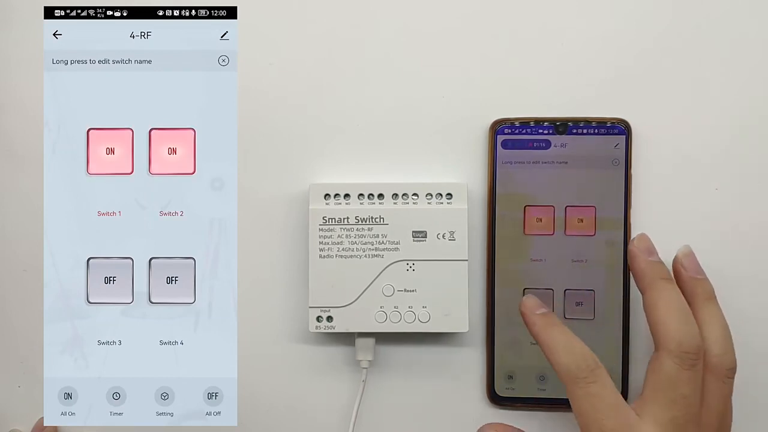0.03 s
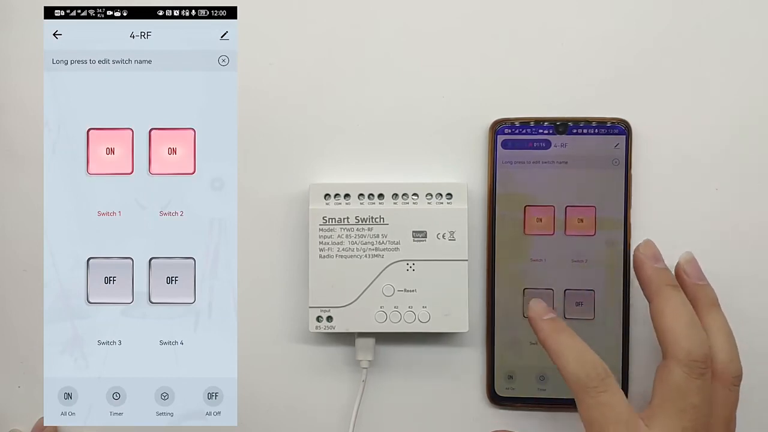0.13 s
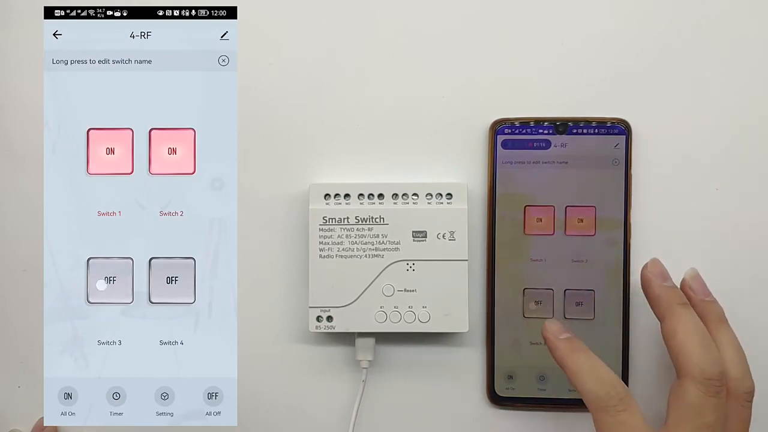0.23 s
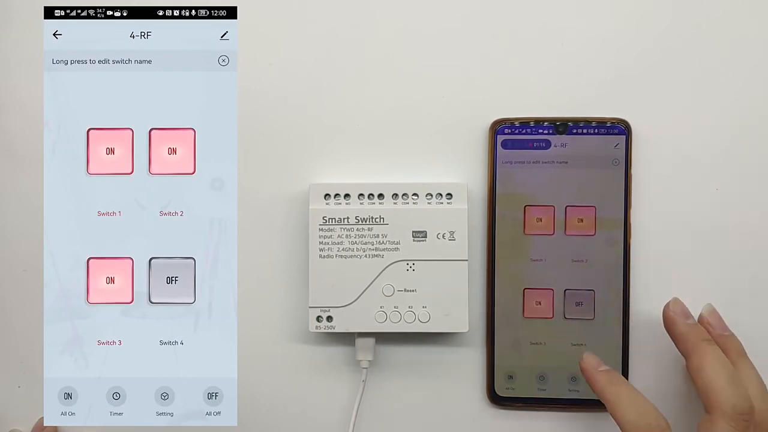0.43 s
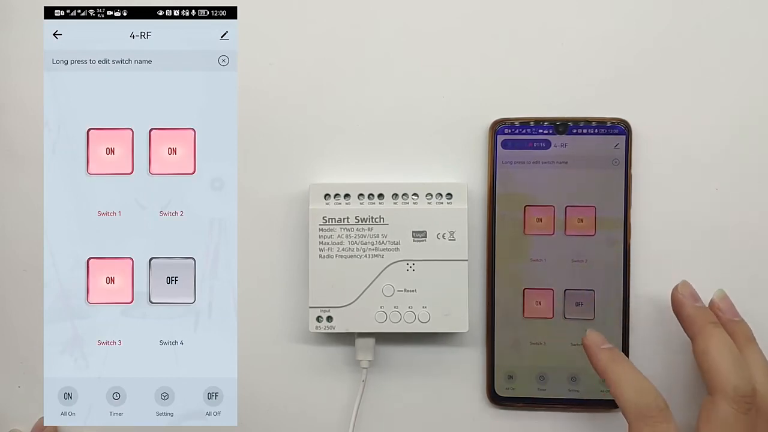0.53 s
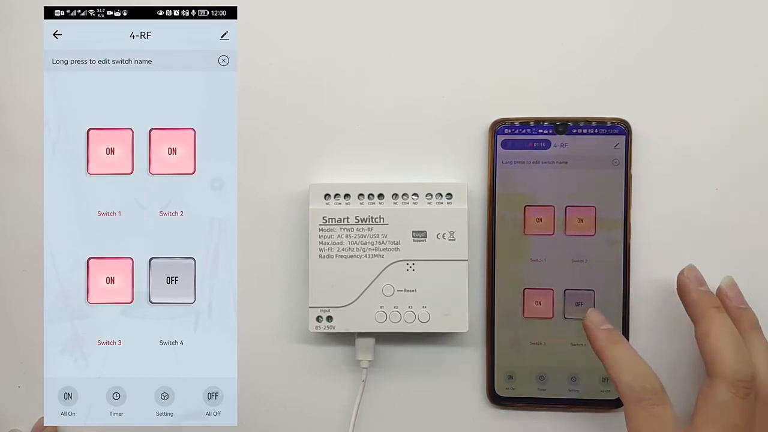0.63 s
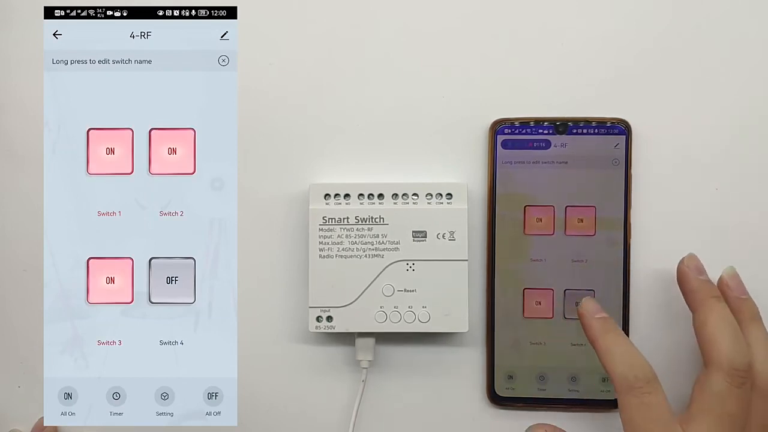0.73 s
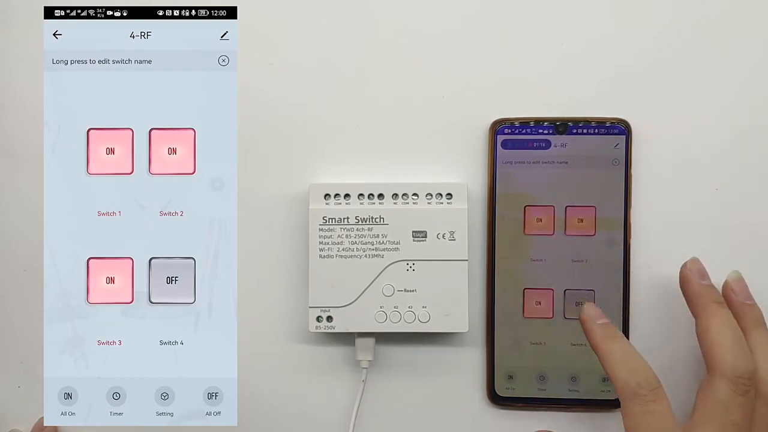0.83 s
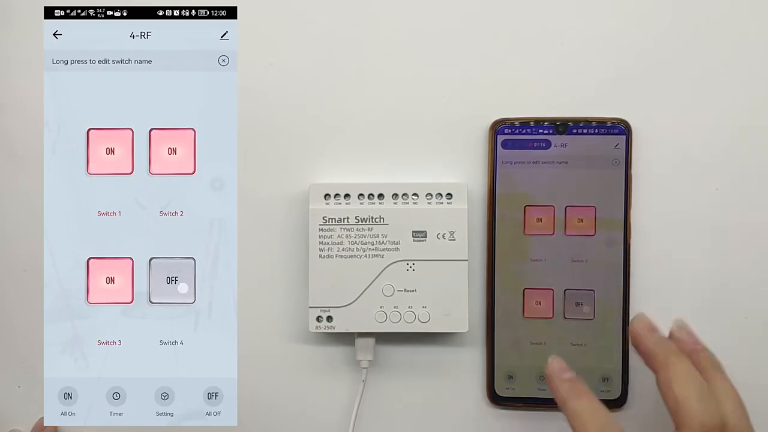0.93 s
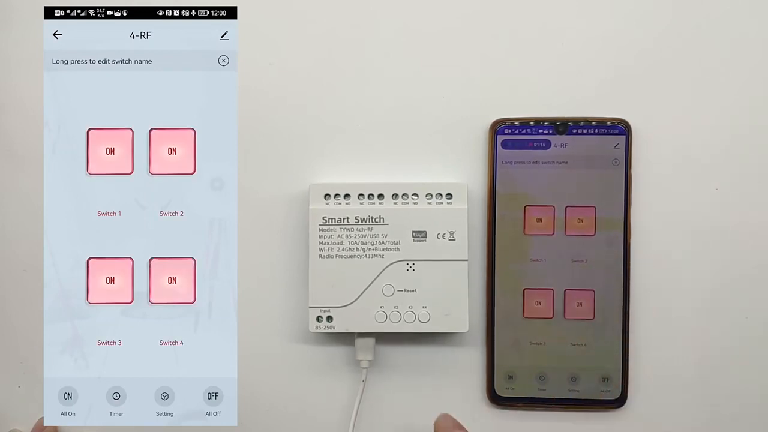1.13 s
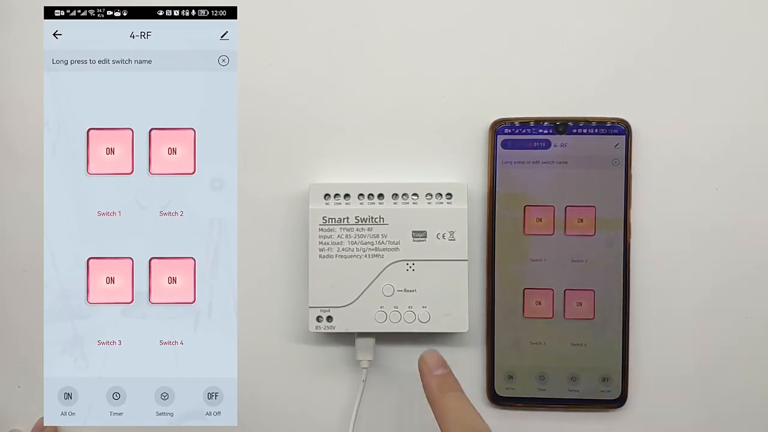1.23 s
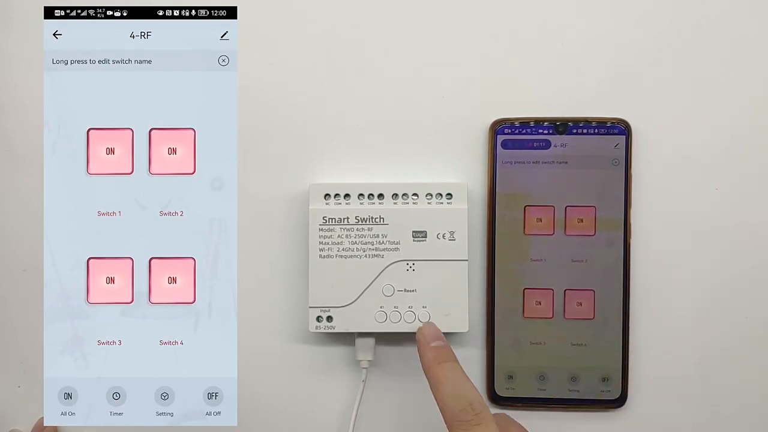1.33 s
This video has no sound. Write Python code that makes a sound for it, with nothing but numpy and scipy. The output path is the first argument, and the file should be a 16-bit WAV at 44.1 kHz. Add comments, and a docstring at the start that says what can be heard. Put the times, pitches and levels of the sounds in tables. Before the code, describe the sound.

Two short, sharp relay clicks from a small switch module over faint room noise.

```python
"""Two relays closing

Two relays in a small plastic switch module on a table close one after the other in a quiet room.
Each click swells in over a few milliseconds, then the armature strikes and chatters, exciting damped
resonances of relay and case, mostly on the right; table and room reflect them. Behind them are a few
tiny ticks, a low rumble with a weak hum, a softly swelling hiss and a faint tone."""
import sys
import numpy as np
from scipy import signal
from scipy.fft import rfft, irfft, next_fast_len
from scipy.io import wavfile
from scipy.ndimage import map_coordinates

SR = 44100
rng = np.random.default_rng(int(sys.argv[2]) if len(sys.argv) > 2 else 0)


def wav_record(signal):
    """Record a signal, one row per channel, as 16-bit PCM in the file named by sys.argv[1]."""
    frames = np.transpose(np.atleast_2d(signal))
    bounded = np.clip(frames, -1, 1)
    # unit amplitude maps onto the largest positive 16-bit level
    quanta = np.round(bounded * 32767).astype(np.int16)
    wavfile.write(sys.argv[1], SR, quanta)


N = 61739
TIME = np.arange(N) / SR
TONE_WAVER_DB, TONE_LEFT_DB = 3.5, -7  # shared by the hum and the faint tone


def relay(closing, resonances):
    """Impact excitation: the click swells in, then the armature strikes and chatters; the case rings."""
    # armature strikes in one closing: delay_s (before stretching), relative_level_db
    contacts = [(0, -4.5), (.0014, -2.5), (.0027, -3.5), (.0043, -5.5)]
    start_s, level_db, onset_rise_s, chatter_t60_s, stretch = closing
    t = TIME - start_s
    soft_onset = amp(-8.5) * fade(-t, t60_s=2 * onset_rise_s)  # grows up to the first strike
    strikes = sum(amp(db) * fade(t - delay_s * stretch, t60_s=0.0041) for delay_s, db in contacts)
    chatter = amp(-5.5) * fade(t, chatter_t60_s) * build_up(t, rise_s=0.0011)
    blow = (soft_onset + strikes + chatter) * rng.choice([-1, 1], (2, N))
    direct = case(blow / np.linalg.norm(blow), resonances, spread=1)
    reflected = case(reflections(start_s), resonances, spread=1.21)
    return amp(level_db) * burst(direct + reflected)


def case(x, resonances, spread):
    """Modal resonance: the modes of relay and case, widened by spread, add in power and filter x."""
    def power(f):
        return sum(amp([[left_db], [right_db]]) ** 2 * peak(f, hz, width_hz * spread)
                   for hz, width_hz, left_db, right_db in resonances)
    return filtered(x, lambda f: minimum_phase(np.sqrt(power(f) / spread)))


def reflections(start_s):
    """Reverberation: early reflections from the table and things near by, then the room's weak tail."""
    # decay of the early reflections: frequency_hz, t60_s
    table_decay = [(1000, 0.11), (3300, 0.065), (7000, 0.076), (14000, 0.07)]
    # decay of the room: frequency_hz, t60_s
    room_decay = [(1000, 0.89), (3300, .5), (7000, 0.35), (14000, 0.23)]
    early = amp(-1.5) * tail(start_s, table_decay, rise_s=0.0017)
    late = amp(-30.5) * tail(start_s, room_decay, rise_s=0.019)
    return early + late


def tail(start_s, decay, rise_s):
    """Diffuse field: stereo noise of energy 1 builds up, then each band decays at its own rate."""
    hz, t, bands = signal.stft(rng.standard_normal((2, N)), SR, nperseg=128)
    bands = bands * fade(np.maximum(t - start_s, 0), along(decay, hz)[:, None])
    field = signal.istft(bands, SR, nperseg=128)[1][:, :N]
    field = field * build_up(TIME - start_s, rise_s)
    return field / np.linalg.norm(field)


def ticks():
    """Transient excitation: each tiny tick is decaying noise through one broad resonance."""
    # ticks: start_s, level_db (before panning), centre_hz, width_hz, t60_s
    taps = [(0.2564, -56, 2860, 1180, 0.26), (0.808, -65.5, 5300, 2980, 0.01),
            (.8364, -67.5, 3260, 2000, 0.026), (.9434, -79, 3500, 2500, 0.022)]
    out = np.zeros((2, N))
    for start_s, level_db, centre_hz, width_hz, t60_s in taps:
        tap = fade(TIME - start_s, t60_s) * rng.standard_normal((2, N))
        tick = filtered(tap, lambda f: minimum_phase(np.sqrt(peak(f, centre_hz, width_hz))))
        out += amp(level_db) * burst(tick)
    return out * pan(left_db=-7.5)


def background():
    """Amplitude modulation: three noise bands swell gently, and the hum follows the rumble."""
    # band envelopes: time_s, hiss_db, middle_db, rumble_db
    envelopes = [(0, -72, -66.5, -59), (.09, -75, -68, -60), (.18, -73, -70, -63.5),
                 (.27, -65.5, -66.5, -62), (.35, -67.5, -66.5, -63.5), (.44, -73.5, -66, -61),
                 (.57, -62.5, -64, -59.5), (.63, -66.5, -65, -60.5), (.72, -73, -66.5, -62.5),
                 (.87, -73, -68.5, -61), (.96, -71, -66, -61.5), (1.009, -67, -65.5, -59.5),
                 (1.08, -73.5, -68, -63), (1.17, -74, -72.5, -65), (1.25, -72.5, -69.5, -64.5),
                 (1.39, -75, -68.5, -60)]
    # spectral shapes of the three bands: frequency_hz, relative_density_db
    hiss_shape = [(300, -28), (1200, -6.5), (2800, -1.5), (5000, -5), (8000, -12.5), (12000, -5),
                  (15500, -8.5)]
    middle_shape = [(100, -38), (350, -3), (500, -4.5), (660, -2), (850, -4), (1150, -3), (1700, -10.5),
                    (4000, -23), (12000, -43.5)]
    rumble_shape = [(15, 0.5), (27, 4), (45, -2.5), (65, -7.5), (110, -4.5), (150, -7.5), (220, -0.5),
                    (280, -6.5), (380, -16.5), (900, -31.5), (4000, -78)]
    time_s, *levels_db = np.transpose(envelopes)
    hiss, middle, rumble = [amp(np.interp(TIME, time_s, db)) for db in levels_db]
    drone = hum()
    return hiss * air(hiss_shape) + middle * air(middle_shape) + rumble * (air(rumble_shape) + drone)


def air(spectrum):
    """Partial coherence: stereo noise of rms 1, nearly mono in the bass and mostly on the right."""
    # likeness of left and right: frequency_hz, correlation
    coherence = [(60, 0.89), (200, 1), (500, 0.27), (1500, 0.2), (5000, 0.13), (14000, 0.13)]
    # channel balance: frequency_hz, left_minus_right_db
    balance = [(60, -6), (200, -9.5), (380, -2), (700, -7.5), (2400, -5.5), (4400, -3.5), (8000, 0.5),
               (11000, -14.5), (15000, -11.5)]

    def mid_side_gains(f):
        angle = np.arccos(np.clip(along(coherence, f), -1, 1)) / 2
        return amp(along(spectrum, f)) * [np.cos(angle), np.sin(angle)]
    mid, side = filtered(rng.standard_normal((2, N)), mid_side_gains)
    stereo = np.array([mid + side, mid - side])
    return unit(filtered(stereo, lambda f: amp([along(balance, f), 0 * f])))


def hum():
    """Superposition: three low, independently wavering tones make a weak hum."""
    # hum partials: pitch_hz, level_db (right channel, relative to the rumble)
    partials = [(86, -16.5), (150, -5.5), (207, -12.5)]
    return sum(tone(hz, db, level_rate_hz=7, drift_rad=0.84, drift_rate_hz=5.28) for hz, db in partials)


def faint_tone():
    """Amplitude modulation: a faint unsteady tone in the room swells between the clicks."""
    # envelope of the tone: time_s, level_db (right channel)
    envelope = [(0, -88), (.3, -85), (.42, -70), (.62, -77.5), (.75, -79.5), (.85, -89), (1.39, -85)]
    level_db = np.interp(TIME, *np.transpose(envelope))
    return tone(651, level_db, level_rate_hz=11.8, drift_rad=1.23, drift_rate_hz=11)


def tone(pitch_hz, level_db, level_rate_hz, drift_rad, drift_rate_hz):
    """Random modulation: a sinusoid wavers in level and phase, stronger on the right."""
    rms = amp(level_db + TONE_WAVER_DB * wobble(level_rate_hz))
    phase = 2 * np.pi * pitch_hz * TIME + drift_rad * wobble(drift_rate_hz)
    return rms * np.sqrt(2) * np.sin(phase) * pan(TONE_LEFT_DB)


def amp(db):
    """Decibels to amplitude ratio."""
    return 10 ** (np.asarray(db) / 20)


def pan(left_db):
    """Level difference: stereo gains that change the left channel only."""
    return amp([[left_db], [0]])


def unit(x):
    """Normalisation to rms 1."""
    return x / np.sqrt(np.mean(x ** 2) + 1e-20)


def burst(x):
    """Normalisation to the energy of 10 ms at rms 1."""
    return unit(x) * np.sqrt(.01 * SR / N)


def along(points, hz):
    """Interpolation of (frequency_hz, value) points on a logarithmic frequency axis."""
    f, values = np.transpose(points)
    return np.interp(np.log(hz + 1), np.log(f + 1), values)


def filtered(x, response):
    """Linear filtering: the spectrum of x times a frequency response."""
    size = 2 * next_fast_len(N)
    return irfft(rfft(x, size) * response(np.fft.rfftfreq(size, 1 / SR)), size)[..., :N]


def minimum_phase(gain):
    """Causality: the response with this gain that rings only after it is struck."""
    cepstrum = irfft(np.log(np.maximum(gain, 1e-6)))
    half = cepstrum.shape[-1] // 2
    cepstrum[..., 1:half] *= 2
    cepstrum[..., half + 1:] = 0
    return np.exp(rfft(cepstrum))


def peak(f, centre_hz, width_hz):
    """Resonance curve: the power response of a cluster of close modes."""
    return 1 / (1 + (2 * (f - centre_hz) / width_hz) ** 2) ** 2


def fade(t, t60_s):
    """Exponential decay: silence before t = 0, then a fall of 60 dB every t60_s."""
    return (t >= 0) * np.exp(-np.log(1000) * np.abs(t) / t60_s)


def build_up(t, rise_s):
    """Exponential approach to 1 from t = 0, with time constant rise_s."""
    return 1 - np.exp(-np.maximum(t, 0) / rise_s)


def wobble(rate_hz):
    """Slow fluctuation: a smooth curve through rate_hz random knots a second."""
    return map_coordinates(rng.standard_normal(int(N * rate_hz / SR) + 4), [TIME * rate_hz])


def scene():
    """Superposition of both relays, the ticks and the sound of the room."""
    # relay closings: start_s, level_db, onset_rise_s, chatter_t60_s, bounce_stretch (ratio)
    closings = [(0.2015, -27, 0.0025, 0.032, 1.05), (0.8849, -28, 0.0018, 0.041, 1.15)]
    # resonances of each relay in the case: centre_hz, width_hz, relative_left_db, relative_right_db
    first_modes = [(1170, 530, -26, -25.5), (1630, 170, -33, -12), (1960, 320, -24.5, -22.5),
                   (2850, 300, -11, -9), (3375, 950, -11, -5), (4700, 1270, -21.5, -13),
                   (5770, 930, -12.5, -12), (7210, 630, -10.5, -17), (7980, 460, -11, -7.5),
                   (9400, 330, -16, -5.5), (10040, 900, -18, -9.5), (11800, 1050, -23, 0.5),
                   (13000, 550, -46, -15), (14870, 1320, -24, 0)]
    second_modes = [(794, 100, -20, -20), (1200, 120, -32, -19.5), (1760, 190, -26.5, -18),
                    (2370, 630, -29, -19), (3376, 660, -14.5, -8), (4750, 1800, -48, -33),
                    (5980, 2340, -17, -15), (7500, 400, -15, -18), (7980, 550, -17, -11),
                    (9500, 670, -18, -11), (10660, 1600, -22.5, -7), (11250, 250, -47, -3),
                    (13400, 590, -25, -1.5), (14400, 1180, -38, -10)]
    clicks = relay(closings[0], first_modes) + relay(closings[1], second_modes)
    return clicks + ticks() + background() + faint_tone()


def record(dry):
    """Band limiting: a very steep low-pass removes the highest treble."""
    cutoff_hz = 15600
    return filtered(dry, lambda f: 1 / np.sqrt(1 + (f / cutoff_hz) ** 240))


dry = scene()
out = record(dry)
wav_record(out)
```